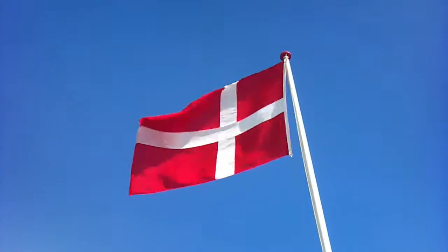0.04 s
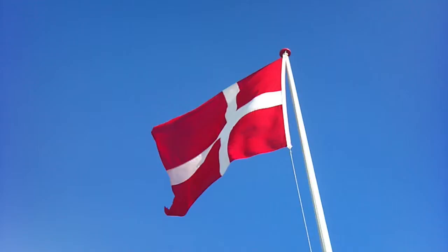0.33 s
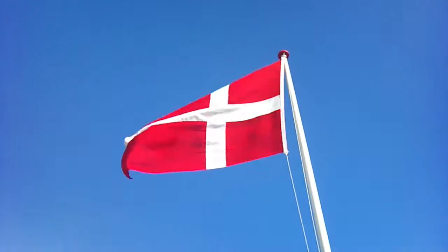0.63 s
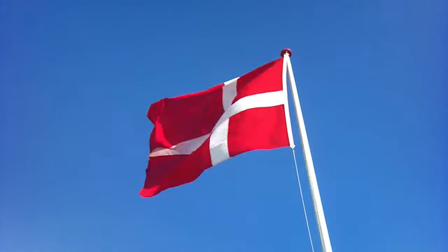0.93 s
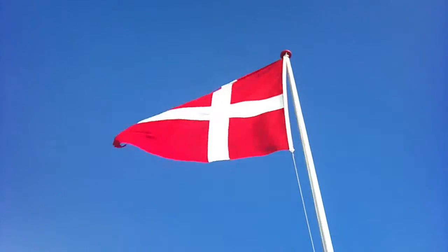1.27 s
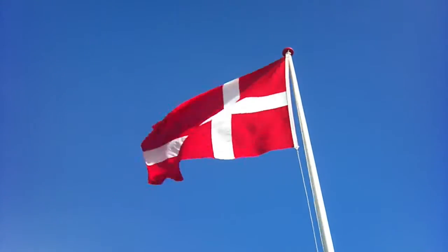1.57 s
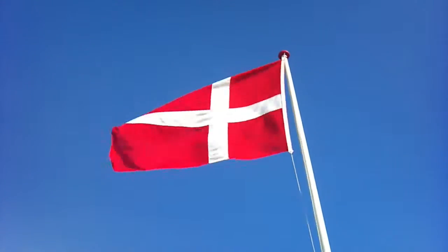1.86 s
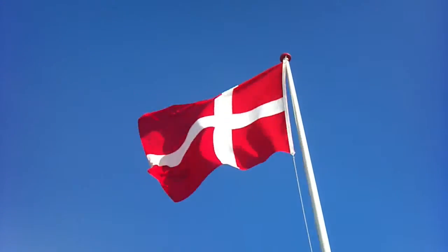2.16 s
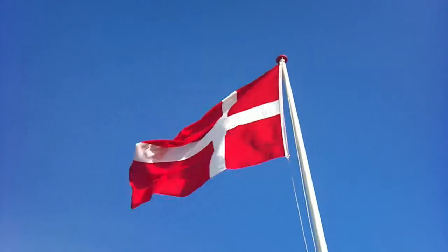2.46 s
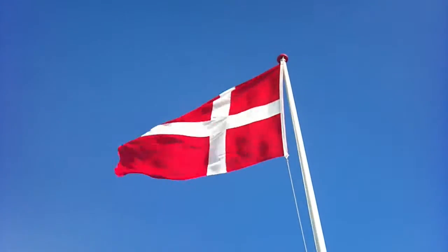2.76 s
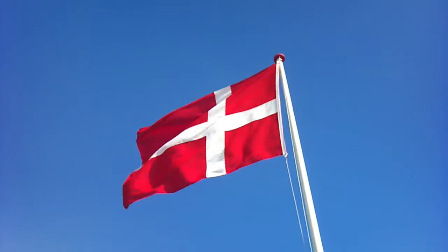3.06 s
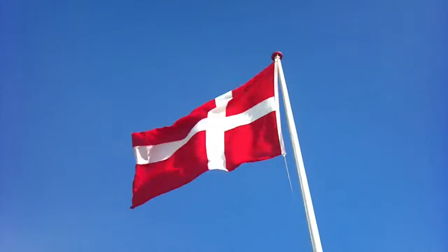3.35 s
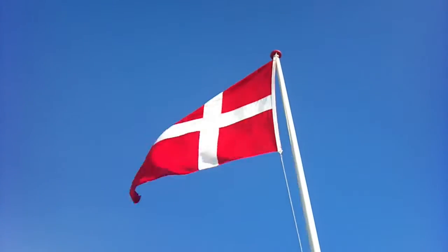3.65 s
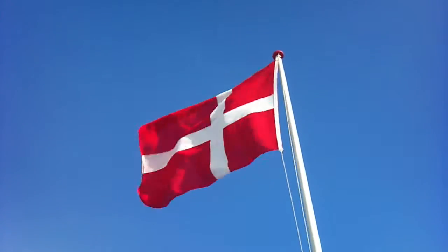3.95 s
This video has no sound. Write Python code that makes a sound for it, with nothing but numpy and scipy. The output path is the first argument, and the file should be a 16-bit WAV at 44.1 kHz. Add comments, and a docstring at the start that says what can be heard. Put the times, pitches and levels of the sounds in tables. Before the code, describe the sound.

A gust of wind buffets an outdoor microphone with a low, crackling rumble. The crackle then dies away, and a rope taps repeatedly against a flagpole with a slight ring while the wind keeps blowing.

```python
"""A strong wind buffets a microphone under a flagpole, rumbling and hissing.
A gust in the first two seconds overloads the microphone and makes it crackle. A few faint squeaks follow.
As the wind eases, the flapping flag whips its rope (the halyard) against the pole about five times
a second, and the pole rings. A fast automatic volume control keeps the rumble at an even level."""
import sys
import numpy as np
from scipy import signal
from scipy.fft import rfft, irfft
from scipy.io import wavfile
from scipy.ndimage import uniform_filter1d

SR = 44100
rng = np.random.default_rng(int(sys.argv[2]) if len(sys.argv) > 2 else 0)


def waveform_to_disk(signal):
    """Save audio, clipped to [-1, 1], as 16-bit WAV at the path in sys.argv[1]."""
    frames = np.transpose(np.atleast_2d(signal))
    scaled = np.clip(frames, -1, 1) * 32767
    samples = np.round(scaled).astype(np.int16)
    wavfile.write(sys.argv[1], SR, samples)


N = 176400  # samples: 4 seconds
T = np.arange(N) / SR  # time of each sample [s]
EDDY_RATE_HZ = 108  # how fast the eddies (small swirls of air) change in strength


def amp(db):
    """Turns decibels into a factor to multiply a sound by."""
    return 10 ** (np.asarray(db) / 20)


def unit(x):
    """Scales a signal to an average size (rms) of 1."""
    return x / np.sqrt(np.mean(x ** 2) + 1e-20)


def noise(spectrum, size=N):
    """Noise of average size 1, shaped by rows of (frequency [Hz], level [dB])."""
    hz, db = np.transpose(spectrum)
    f = np.fft.rfftfreq(size, 1 / SR)
    gain = amp(np.interp(np.log(f + 1), np.log(hz), db))
    return unit(irfft(rfft(rng.standard_normal(size)) * gain, size))


def wander(rate_hz):
    """A smooth random wobble of average size 1, up to about rate_hz fast."""
    f = np.fft.rfftfreq(N, 1 / SR)
    return unit(irfft(rfft(rng.standard_normal(N)) * f / (f + 4) * np.exp(-(f / rate_hz) ** 2), N))


def wind():
    """Air rumbles, swirls and fizzes against the microphone and overloads it, under a soft hiss."""
    # strength of the wind (time [s], level [dB])
    gust = [(0, 9), (.12, -1.5), (.23, 8), (.45, 7), (.55, 2), (.72, 8), (.95, 9), (1.2, 5.5), (1.4, 7.5),
            (1.52, 3), (1.9, 6), (2.25, 3.5), (2.6, -0.5), (3.2, 1.5), (3.6, 0), (4, 2)]
    # brief lulls in the wind (middle time [s], level change [dB])
    lulls = [(0.208, -1.5), (1.542, -3), (1.99, -9.5), (2.11, -2.5), (2.385, -4.5), (2.563, -2.5),
             (2.729, -6.5), (2.93, -9), (2.982, -3.5), (3.16, -3), (3.329, -4), (3.701, -5.5)]
    # single shoves of air (peak time [s], level [dB], fall time [s])
    buffets = [(0.044, -16, 0.01), (0.079, -20, 0.008), (0.104, -10, 0.015), (0.186, -8, 0.021),
               (0.243, -9, 0.012), (0.287, -9, 0.017), (0.334, -10, 0.013), (0.37, -11, 0.023),
               (0.413, -10, 0.018), (0.445, -15, 0.011), (0.479, -11, 0.009), (0.543, -9, 0.011),
               (0.595, -9, 0.021), (0.643, -9, 0.016), (0.685, -5, 0.009), (0.71, -6, 0.017),
               (0.76, -6, 0.01), (0.834, -7, 0.01), (0.918, -5, 0.028), (1.041, -8, 0.01),
               (1.092, -9, 0.017), (1.147, -7, 0.011), (1.182, -11, 0.01), (1.261, -7, 0.013),
               (1.33, -13, 0.019), (1.376, -9, 0.027), (1.445, -17, 0.009), (1.511, -20, 0.011),
               (1.561, -14, 0.009), (1.6, -16, 0.008), (1.631, -12, 0.018), (1.676, -22, 0.012),
               (1.77, -10, 0.011), (1.828, -15, 0.009), (1.894, -10, 0.016), (1.921, -12, 0.01),
               (1.968, -11, 0.012), (2.004, -15, 0.012), (2.084, -10, 0.011), (2.14, -18, 0.012),
               (2.2, -15, 0.028), (2.271, -18, 0.01), (2.32, -13, 0.028), (2.466, -21, 0.012),
               (2.498, -14, 0.017), (2.544, -19, 0.017), (2.61, -16, 0.026), (2.649, -22, 0.01),
               (2.701, -16, 0.022), (2.761, -14, 0.012), (2.826, -17, 0.011), (2.868, -11, 0.022),
               (2.907, -15, 0.02), (2.959, -19, 0.016), (3.008, -15, 0.016), (3.11, -15, 0.02),
               (3.184, -20, 0.013), (3.286, -14, 0.028), (3.384, -21, 0.028), (3.446, -18, 0.014),
               (3.514, -14, 0.01), (3.542, -14, 0.016), (3.597, -17, 0.018), (3.635, -19, 0.01),
               (3.665, -22, 0.011), (3.721, -18, 0.016), (3.815, -18, 0.011), (3.843, -14, 0.013),
               (3.932, -19, 0.011), (3.965, -15, 0.016)]
    # how much the eddies fizz (time [s], level [dB])
    fizz_level = [(0, -7.5), (.7, -3), (1.4, -6), (1.75, -3.5), (2.1, -3.5), (2.35, -20), (4, -18.5)]
    # tone of the rumble, swirl, fizz and hiss (frequency [Hz], level [dB])
    rumble_tone = [(10, -36), (30, -9.5), (60, 0), (115, 0.5), (200, -4), (330, -10), (600, -48.5),
                   (1200, -38.5), (3000, -97)]
    swirl_tone = [(40, -14), (150, -3), (280, 0), (480, -4), (800, -13), (1300, -28), (2200, -46),
                  (4000, -66)]
    fizz_tone = [(300, 1.5), (750, 11), (1300, 1.5), (2200, -10), (4000, -26), (8000, -49)]
    hiss_tone = [(200, 6), (1000, -4.5), (2000, -3.5), (4000, -16.5), (7000, -15.5), (8000, -32)]
    lull_s, overload_db, clip_hardness = 0.026, -8.5, 9
    eddy_growth, fizz_growth, hiss_growth = 2.034, 1.7, 0.46  # above 1: grows faster than what drives it

    dips_db = sum(db * np.exp(-np.minimum(((T - s) / lull_s) ** 2, 20)) for s, db in lulls)
    gust_db = np.interp(T, *np.transpose(gust)) + dips_db
    flutter_db = 4.5 * np.clip(wander(EDDY_RATE_HZ), -3, 1.5)
    lumps = amp(-30 + flutter_db + eddy_growth * gust_db)  # eddies come in lumps
    shoves = np.zeros(N)
    for s, db, fall_s in buffets:
        near = abs(T - s) < 2 * fall_s
        width = fall_s * np.where(T[near] < s, 0.64, 1)  # rises faster than it falls
        shoves[near] += amp(db) * np.exp(-2 * ((T[near] - s) / width) ** 2)
    surge = np.hypot(lumps, shoves)
    swirl = amp(-1.5) * surge * noise(swirl_tone)
    fizz_db = np.interp(T, *np.transpose(fizz_level))
    fizz = amp(fizz_db) * surge ** fizz_growth * noise(fizz_tone)
    rumble = amp(-19 + gust_db) * noise(rumble_tone)
    push = rumble + swirl + fizz
    # The overload flattens the biggest peaks.
    clipped = push / (1 + abs(push / amp(overload_db)) ** clip_hardness) ** (1 / clip_hardness)
    hiss = amp(-54.5 + hiss_growth * gust_db) * noise(hiss_tone)
    return clipped + hiss


def crackles():
    """The overloaded microphone's signal jumps in ragged runs; each jump settles in about a millisecond."""
    # small random crackles, thickest as the gust peaks (time [s], rate [crackles per s])
    crackle_rate = [(.15, 0), (.25, 150), (.6, 200), (.7, 800), (1.02, 750), (1.2, 60), (2.3, 0)]
    # single sharp crackles (time [s], level [dB])
    sharp_crackles = [(0.2438, -7), (0.481, -14), (0.496, -17), (0.58, -19), (0.597, -11), (.683, -9),
                      (0.7, -11), (.914, -15), (1.092, -12), (1.179, -16), (1.372, -12.5), (1.47, -27),
                      (1.5995, -39), (1.644, -32), (1.892, -18), (1.918, -24), (2.096, -26.5), (2.914, -21)]
    settle_s, gap_s, fade_db = 0.00072, 0.0017, 8

    hit = rng.random(N) < np.interp(T, *np.transpose(crackle_rate)) / SR
    jumps = hit * rng.standard_normal(N)
    jumps *= amp(-30 + 4 * np.minimum(wander(EDDY_RATE_HZ), 1))  # quiet and uneven
    for s, db in sharp_crackles:
        for k, gap in enumerate(rng.uniform(.3, 1.3, size=4)):  # four fading jumps, up and down in turn
            jumps[round(s * SR)] = amp(db - k * fade_db) * (-1) ** k
            s += gap * gap_s
    return signal.lfilter([1], [1, -np.exp(-1 / (settle_s * SR))], jumps)


def squeaks():
    """Thin, unsteady whistles that swell and fade, most of them sliding in pitch."""
    # faint high squeaks (middle time [s], fade time [s], pitch [Hz], slide [Hz per s], level [dB])
    whistles = [(1.5, .04, 3650, 0, -61), (2.38, .05, 4550, -1000, -62), (2.468, .025, 4580, 2000, -58),
                (2.768, .02, 4100, -22000, -60)]
    waver = 1 + .025 * wander(rate_hz=300)
    out = np.zeros(N)
    for s, fade_s, hz, slide, db in whistles:
        pitch_hz = (hz + slide * (T - s)) * waver
        swell = amp(db) * np.exp(-((T - s) / fade_s) ** 2)
        out += swell * np.sin(2 * np.pi * np.cumsum(pitch_hz) / SR)
    return out


def slap(db, bright_hz, brush_db, size=16384):
    """The rope brushes the pole, hits, chatters and leaves it ringing. Gives (times from hit, sound)."""
    # tone of a slap (frequency [Hz], level [dB])
    slap_tone = [(400, -22), (1500, -5), (2200, -5), (3000, -6), (5800, -6.5), (7200, -14), (8200, -26.5)]
    # ringing notes of the pole (pitch [Hz], level [dB], time to fade by 60 dB [s])
    pole_notes = [(1830, -3, .2), (2110, -6, .2), (2780, 0, .1), (3360, -3, .1), (4040, 0, .12),
                  (4554, -2, .12), (5660, -1, .12)]
    brush_s, crack_s, chatter_s, tail_s = 0.0077, 0.00044, 0.0081, 0.022
    crack_db, chatter_db, tail_db, pole_db = -9, -22.5, -35, -45
    ring_share = 0.34  # the ring varies less from slap to slap than the blow does

    t = (np.arange(size) - size // 16) / SR
    after = np.maximum(t, 0)
    brush = amp(brush_db) * np.exp(-abs(t) / brush_s)
    crack = amp(crack_db) * (after / crack_s) ** 2 * np.exp(1 - (after / crack_s) ** 2)
    chatter = amp(chatter_db) * np.exp(-after / chatter_s)
    rattle = amp(2.5 * wander(rate_hz=394)[:size])  # the rope rattles unevenly
    contact = crack + np.where(t < 0, brush, chatter) * rattle
    notes = sum(amp(level - 60 * after / fade_s) * np.sin(2 * np.pi * (hz * after + rng.random()))
                for hz, level, fade_s in pole_notes)
    tail = amp(tail_db) * np.exp(-after / tail_s) * noise(slap_tone, size)
    ring = amp(ring_share * db) * (amp(pole_db) * notes + tail) * (t > 0)
    f = np.geomspace(300, 10000, 60)
    boost_db = 5 * np.exp(-(np.log2(f / bright_hz) / .2) ** 2)  # a narrow peak around bright_hz
    tone_db = np.interp(f, *np.transpose(slap_tone)) + boost_db
    blow = amp(db) * contact * noise(np.c_[f, tone_db], size)
    return t, blow + ring


def halyard():
    """The flag's rope hits the pole again and again, some times harder than others."""
    # slaps of the rope (time [s], level [dB], brightest pitch [Hz], brush before the hit [dB])
    slaps = [(2.4232, -4, 5600, -31.5), (2.6128, -5.5, 3900, -24), (2.7905, -9.5, 3600, -34.5),
             (3.1758, -17.5, 3600, -34), (3.3540, -8, 5900, -38), (3.5455, -40, 3000, -29),
             (3.7302, -9.5, 4900, -39), (3.9103, -16.5, 4600, -34)]
    out = np.zeros(N)
    for s, db, bright_hz, brush_db in slaps:
        t, sound = slap(db, bright_hz, brush_db)
        start = round((s + t[0]) * SR)
        out[start:start + len(sound)] += sound[:N - start]
    return out


def scene():
    """Adds up the wind, crackles, rope and squeaks in one channel."""
    return (wind() + crackles() + halyard() + squeaks())[None]


def record(dry):
    """Cuts the deepest bass, quickly turns loud moments down, then cuts the highest treble."""
    low_cut_hz, high_cut_hz = 10, 8200
    sense_s, limit_db, recover_db_per_s = 0.075, -20.5, 57
    squeeze = 0.71  # share of the decibels above the limit that is taken away

    x = signal.lfilter(*signal.butter(1, low_cut_hz, "high", fs=SR), dry)
    power_db = 10 * np.log10(abs(uniform_filter1d(x[0] ** 2, int(sense_s * SR))) + 1e-12)
    fall_db = T * recover_db_per_s
    held_db = np.maximum.accumulate(power_db + fall_db) - fall_db  # jumps up, then sinks steadily
    over_db = np.maximum(held_db - limit_db, 0)
    levelled = x * amp(-squeeze * uniform_filter1d(over_db, size=300))
    treble_cut = signal.firwin(161, high_cut_hz, window=("kaiser", 9), fs=SR)
    return signal.oaconvolve(levelled, treble_cut[None], "same")


dry = scene()
out = record(dry)
waveform_to_disk(out)
```